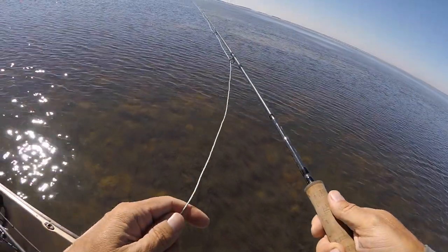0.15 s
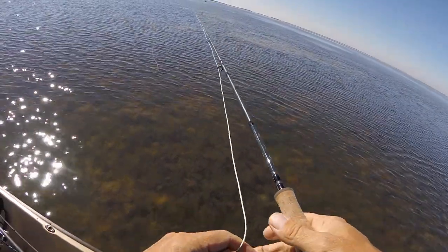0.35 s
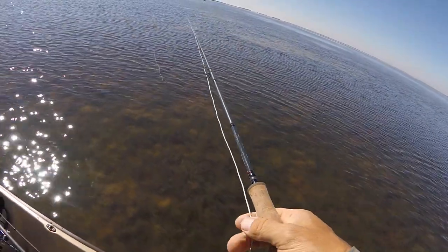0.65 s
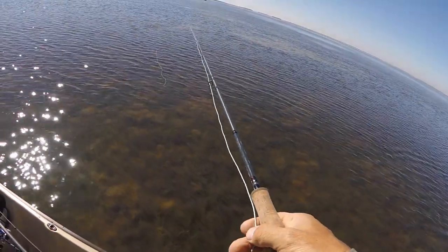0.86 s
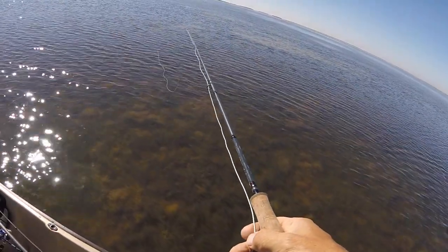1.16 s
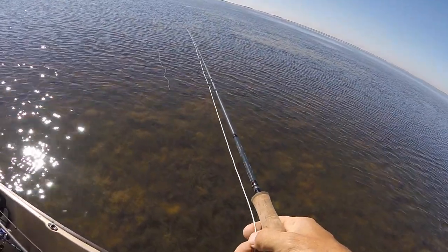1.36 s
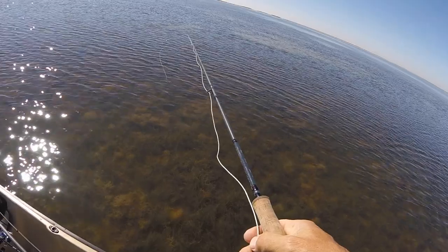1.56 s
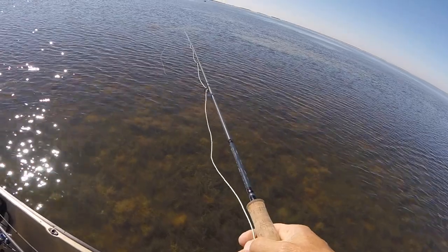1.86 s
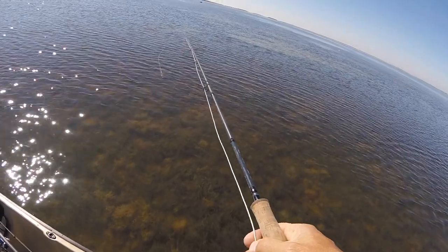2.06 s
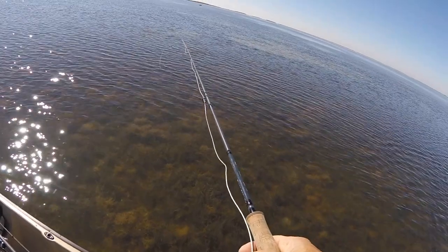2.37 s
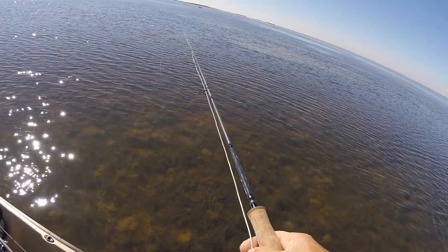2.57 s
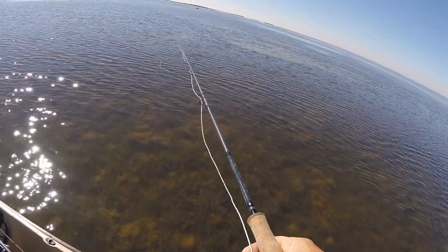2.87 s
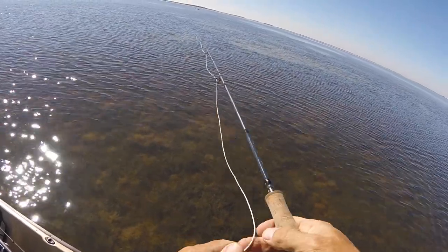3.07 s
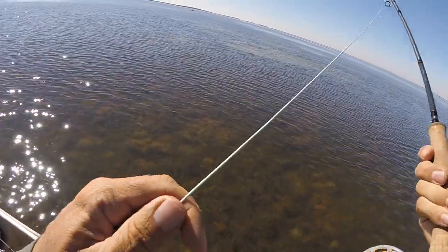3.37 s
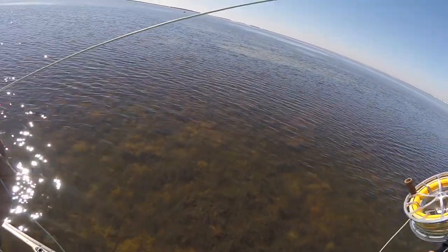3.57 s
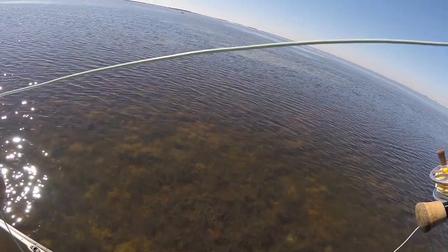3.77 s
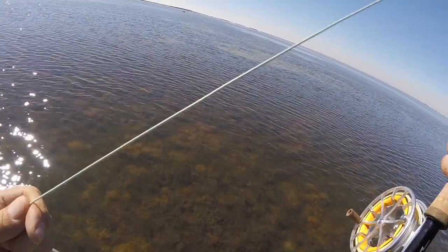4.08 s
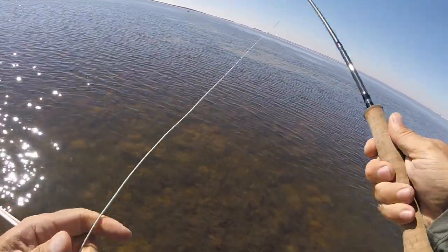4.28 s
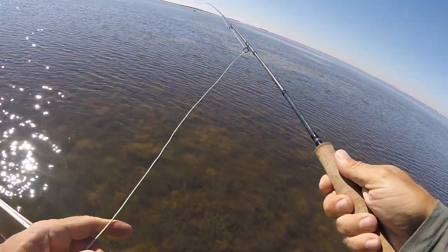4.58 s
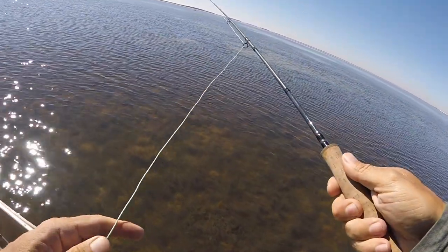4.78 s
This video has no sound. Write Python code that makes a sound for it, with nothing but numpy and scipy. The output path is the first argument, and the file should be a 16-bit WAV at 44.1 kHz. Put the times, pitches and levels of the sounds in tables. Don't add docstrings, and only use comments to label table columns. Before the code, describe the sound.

Close gritty rubs and brief squeaky zips of fishing line through guides, ending in a sharp haul and long fluttering whistle, with soft boat hum.

```python
import sys
import numpy as np
from scipy import signal
from scipy.fft import rfft, irfft, next_fast_len
from scipy.io import wavfile
from scipy.ndimage import uniform_filter1d

SR = 44100
rng = np.random.default_rng(int(sys.argv[2]) if len(sys.argv) > 2 else 0)


def transcribe(u):
    v = np.clip(np.atleast_2d(u).T, -1, 1)
    q = np.round(v * 32767).astype(np.int16)
    wavfile.write(sys.argv[1], SR, q)


def field_ratio(decibels):
    return 10 ** (np.asarray(decibels, dtype=float) / 20)


N = 217608
T = np.arange(N) / SR


def evened(x):
    return x / np.sqrt(np.mean(x ** 2) + 1e-20)


def read(points, hz):
    f, value = np.transpose(points)
    return np.interp(np.log(hz + 1), np.log(f + 1), value)


def shaped(x, gain):
    size = next_fast_len(len(x))
    spectrum = rfft(x, size) * gain(np.fft.rfftfreq(size, 1 / SR))
    return irfft(spectrum, size)[:len(x)]


def band(x, lo_hz, hi_hz):
    return shaped(x, lambda f: 1 / np.sqrt((1 + (lo_hz / (f + 1)) ** 16) * (1 + (f / hi_hz) ** 16)))


def wander(count, hz):
    return evened(shaped(rng.standard_normal(count), lambda f: np.exp(-(f / hz) ** 2)))


def swells(rows, width_s):
    return sum(field_ratio(db) * np.exp(-((T - s) / width_s) ** 2) for s, db in rows)


# time in seconds, level in dB.
GUSTS = [
    (0.04, -52.5),
    (0.32, -61),
    (0.63, -62),
    (0.89, -74),
    (2.62, -77),
    (3.2, -82),
    (3.53, -75),
]


def wind():
    rumble = shaped(band(rng.standard_normal(N), 25.0, 100), lambda f: (f + 20) ** -.5)
    steady = field_ratio(-62 - 3 * T + wander(N, 2.5))
    return evened(rumble) * (steady + swells(GUSTS, width_s=0.14))


# pitch in Hz, level in dB per Hz.
AIR_COLOUR = [(105, -90), (130, 9.5), (162, 8), (360, -13.5), (560, -17), (1000, -24), (1630, -31),
              (2500, -31), (3300, -39.5), (4500, -44.5), (6000, -41.5), (7500, -35), (11000, -42.5),
              (15000, -47.5)]
# time in seconds, level in dB.
HUM_SURGES = [
    (0.45, -45),
    (1.26, -47),
    (2.24, -42.5),
    (3.4, -40.5),
]


def hum_and_hiss():
    air = shaped(rng.standard_normal(N), lambda f: field_ratio(read(AIR_COLOUR, f)))
    hum_level = field_ratio(-47.5 + wander(N, 8.1)) + .5 * swells(HUM_SURGES, width_s=0.032)
    hiss_level = field_ratio(-55 + .5 * wander(N, 5.2))
    return evened(band(air, 143, 286)) * hum_level + evened(band(air, 324, 20000)) * hiss_level


# time in seconds, level in dB.
RIPPLES = [
    (0.45, -64.5),
    (2.05, -64.5),
    (3.15, -71),
    (3.6, -65),
    (3.9, -70),
]


def wash():
    water = evened(band(rng.standard_normal(N), 730, 2080))
    steady = field_ratio(-74 + 3 * T + 1.7 * wander(N, 4.6))
    return water * (steady + swells(RIPPLES, width_s=0.14))


# start in seconds, peak in dB, centre in Hz, width in Hz.
TICKS = [(0.382, -49, 1390, 500), (0.527, -41, 1450, 600), (1.182, -50, 1410, 500), (1.249, -46, 1310, 500),
         (1.653, -44, 1310, 500), (1.956, -43, 1460, 500), (4.194, -42, 1280, 507),
         (0.1161, -48, 6300, 2100), (0.47, -44, 2900, 1800), (3.3, -27, 4200, 1200),
         (3.998, -44, 5300, 600), (0.3294, -56, 4500, 1980), (3.105, -47, 9200, 1500),
         (3.1253, -45, 9250, 1400), (3.1542, -51, 9200, 1300), (3.1794, -60, 10500, 600),
         (4.3889, -38, 10200, 900), (4.4594, -40, 11200, 900), (4.5396, -44, 10600, 900),
         (4.6653, -43, 10800, 900), (4.8359, -42, 10600, 596), (4.8794, -57, 10600, 600)]


def ticks():
    count = 900
    out, t = np.zeros(N), np.arange(count) / SR
    for s, db, hz, width in TICKS:
        puff = shaped(rng.standard_normal(count), lambda f: np.exp(-((f - hz) / width) ** 2))
        puff *= field_ratio(-60 * t / 0.055) * (1 - np.exp(-t / 0.00054))
        at = round(s * SR)
        out[at:at + count] += field_ratio(db - 3.5) * puff / abs(puff).max()
    return out


# pitch in Hz, level in dB per Hz.
HOUSING = [(880, -13), (1500, -12), (1910, -12), (2080, -18.5), (2310, -0.5), (2770, -1.5), (3230, 1),
           (3940, -6), (4190, 3), (4410, 3.5), (4850, -1.5), (5380, 1), (7470, -12), (10700, -16.5),
           (11800, -28), (15300, -46), (22000, -120)]
# pitch in Hz, width in Hz, boost in dB.
RINGS = [(2630, 270, -0.5), (2830, 21, 4), (3010, 18, 8), (3314, 30, 4.5), (3620, 21, 11), (3790, 68, 9.5),
         (4710, 34, 4.5), (5036, 76, 9.5), (5448, 96, 9), (6630, 1180, 14.5), (8750, 210, 5),
         (10900, 3300, 8.5)]
# pitch in Hz, width in Hz, depth in dB.
NOTCHES = [(4400, 380, 13), (7400, 500, 4), (6800, 900, 9), (6450, 350, 4), (2100, 250, 4)]


def housing_db(hz):
    rings = sum(db / (1 + (2 * (hz - f) / w) ** 2) for f, w, db in RINGS)
    notches = sum(db * np.exp(-(2 * (hz - f) / w) ** 2) for f, w, db in NOTCHES)
    return read(HOUSING, hz) + rings - notches


def patchy(x, patch_db, bins, frames):
    z = signal.stft(x, nperseg=256, noverlap=192)[2]
    field = rng.standard_normal(z.shape)
    for _ in range(2):
        field = uniform_filter1d(uniform_filter1d(field, bins, 0), frames, 1)
    return signal.istft(z * field_ratio(patch_db * evened(field)), nperseg=256, noverlap=192)[1][:N]


def pull(start, length, sag_db):
    crest, attack_s, release_s = 0.27, .014, .016
    sag_share = (1.0, 2.1, 2.34)
    u = (T - start) / length
    rise = sag_db[0] * (1 - u / crest) ** 2
    fall = sag_db[1] * ((u - crest) / (1 - crest)) ** 2
    sag = np.minimum(np.where(u < crest, rise, fall), 40)
    edges = np.clip(np.minimum((T - start) / attack_s, (start + length - T) / release_s) + .5, 0, 1)
    return edges * field_ratio(-np.outer(sag_share, sag))


# start in seconds, length in seconds, rub in dB, extra for the low part in dB, for the high in dB.
SHORT_RUBS = [(0.26, 0.067, -73, 10.5, 0), (0.35, 0.21, -72.5, 12.5, -6), (0.58, 0.18, -81.5, 23.5, -2),
              (0.89, 0.23, -78.5, 11, -18), (1.2, 0.2, -69, 5, -14), (1.29, 0.1, -63, 11, 0),
              (1.33, 0.26, -52, 3, -4.5), (1.81, 0.24, -68.5, -4, -2), (1.895, 0.074, -58, 10, -1),
              (1.915, 0.29, -48.5, 0, -2), (2.255, 0.013, -63.5, 2, 2), (2.35, 0.14, -67, -1, -2),
              (2.538, 0.33, -48, -3.5, -7), (2.62, 0.24, -51, 0, 1.5), (2.89, 0.024, -66, -15, -2),
              (3.02, 0.14, -62, -8, -6), (3.08, 0.088, -50.5, -10, -16), (3.66, 0.38, -63, -6, -20),
              (3.9, 0.13, -62, -16, -14), (3.965, 0.027, -54, -16, -14), (1.985, 0.026, -72, 0, 25),
              (2.035, 0.036, -73, 0, 22), (4.27, .07, -70, 0, 14), (4.385, 0.061, -74, 0, 22),
              (4.45, 0.032, -79, 0, 18), (4.535, 0.027, -75, 0, 22), (4.66, 0.02, -74, 0, 26),
              (2.655, .02, -70, 0, 20), (2.72, 0.056, -69.5, 0, 18.5), (1.34, 0.026, -74.5, 0, 19.5)]
PULLS = [(0.2, 0.92, -93.5, 25.5, -5), (0.0, 0.22, -78, 10.5, -6), (3.125, 0.062, -58, -11, -8),
         (3.17, 0.068, -45, -8, -18), (3.22, 0.082, -39.5, -8, -20), (3.28, 0.15, -38, -13, -18.5),
         (3.4, 0.18, -44, -13, -5), (3.55, 0.064, -48, -10, -12), (3.97, 0.44, -55, -2, -1.5),
         (4.19, 0.13, -45.5, -1, -8), (4.26, 0.21, -43, -10, -14.5), (4.41, 0.23, -40, -13.5, -12),
         (4.61, 0.31, -42, -13.5, -13.5)]


def rubbing():
    rest_db = np.array((-76.5, -99, -80))[:, None]
    creep_db_per_s = [0, 0, 4]
    power = field_ratio(rest_db + np.outer(creep_db_per_s, T)) ** 2
    for rows, sag_db in (SHORT_RUBS, (8, 8.5)), (PULLS, (4.5, 2.5)):
        for start, length, db, low_db, high_db in rows:
            part_level = field_ratio(db + np.array([[low_db], [0], [high_db]]))
            power = power + (part_level * pull(start, length, sag_db)) ** 2
    grit = rng.standard_normal(N)
    grit *= field_ratio(1.2 * wander(N, 170) + .9 * wander(N, 50) + .3 * wander(N, 14))
    grit = patchy(grit, 2.5, bins=2, frames=8)
    grit = patchy(grit, .4, bins=6, frames=30)
    grit = shaped(grit, lambda f: field_ratio(housing_db(f)))
    parts_hz = [(1500, 3690), (4350, 5330), (7200, 18500)]
    return sum(np.sqrt(p) * evened(band(grit, lo, hi)) for p, (lo, hi) in zip(power, parts_hz))


# pitch in Hz, level in dB.
ZIP_COLOUR = [(1000, -26), (1550, -23), (2000, -16), (3400, -4), (4450, -7), (5400, 0), (6150, -13),
              (6900, -8), (7500, -16), (8200, -11), (9000, -17), (10600, -13), (14000, -28)]


def zip_tone(speed, bite_db, partials_db, colour=.35, jitter=.009, blur=.06, clear=.66, skirt=.45,
             flutter_db=2.2):
    s, hz = np.transpose(speed)
    on = (T >= s[0] - .004) & (T < s[-1] + .004)
    t = T[on]
    rate = np.interp(t, s, hz) * (1 + jitter * wander(len(t), 79))
    turns, out = np.cumsum(rate) / SR, np.zeros(N)
    for k, db in enumerate(partials_db, 1):
        ring_db = housing_db(k * rate) - read(HOUSING, k * rate)
        passing_db = read(ZIP_COLOUR, k * rate) + colour * ring_db
        dulling_db = (k > 2) * 2.0 * rate / 1000
        flutter = flutter_db * wander(len(t), 110)
        level = field_ratio(np.interp(t, s, bite_db) + db - dulling_db + passing_db + flutter)
        spread_hz = blur * hz.mean() * np.sqrt(k)
        fuzz = clear + skirt * (wander(len(t), spread_hz) + 1j * wander(len(t), spread_hz))
        whistle = (fuzz * np.exp(2j * np.pi * k * turns)).real
        out[on] += np.sqrt(2) * level * whistle * (k * rate < 15000)
    out[on] *= signal.windows.tukey(len(t), min(0.0043 * SR / len(t), 1))
    return out


def glide(start, length, from_hz, to_hz, db):
    u = np.linspace(0, 1, 9)
    speed = np.transpose([start + length * u, to_hz + (from_hz - to_hz) * (1 - u) ** 1.5])
    return speed, db - 20 * (u - .6) ** 2


# start in seconds, length in seconds, from Hz, to Hz, bite in dB.
GLIDES = [
    (1.335, .08, 2590, 4400, -45),
    (2.57, .035, 2480, 3080, -46),
    (2.012, .045, 4250, 5250, -39),
]
SQUEALS = [(1.9, .018, 2600, 4200, -41), (1.914, .03, 6150, 6250, -37), (2.06, .03, 5000, 5100, -45),
           (3.02, .05, 4620, 4560, -49), (2.69, .075, 3400, 2900, -43), (2.56, .03, 5050, 5050, -48),
           (3.085, .035, 5000, 5050, -47), (3.49, .048, 3840, 4250, -42), (2.628, .016, 5000, 5150, -43),
           (2.668, .024, 5100, 5150, -41), (1.364, .016, 5050, 5300, -50), (1.4, .022, 5100, 5050, -48),
           (1.476, .018, 5450, 5000, -48), (1.897, .018, 5400, 5500, -50), (3.985, .012, 8200, 8400, -45),
           (2.7, .012, 5050, 5050, -43), (2.72, .045, 10900, 11000, -44), (2.757, .018, 5400, 4900, -45),
           (2.785, .015, 5050, 5000, -47), (3.292, .03, 5500, 5550, -43), (3.325, .025, 4500, 4800, -36),
           (3.44, .025, 9000, 9500, -40), (3.755, .03, 1600, 1600, -40), (3.745, .04, 2400, 2420, -55),
           (3.825, .025, 1900, 1750, -46), (3.835, .03, 2450, 2450, -56)]
GLIDE_PARTIALS_DB = (0, -1, -4)


def glides_and_squeals():
    glides = sum(zip_tone(*glide(*row), GLIDE_PARTIALS_DB) for row in GLIDES)
    return glides + sum(zip_tone(*glide(*row), [0]) for row in SQUEALS)


# time in seconds, ridges a second in Hz.
# The bite lists say how hard the ridges bite at each of those moments, in dB.
SECOND, SECOND_BITE_DB = [(1.946, 2250), (1.958, 2600), (1.968, 3050), (1.98, 3330), (1.993, 3530),
                          (2.006, 3580)], [-41, -42, -46, -37, -35, -40]
THIRD, THIRD_BITE_DB = [(2.632, 2850), (2.65, 3120), (2.665, 3400), (2.68, 4100), (2.7, 4400),
                        (2.722, 4650), (2.74, 4050)], [-50, -43, -45, -46, -48, -46, -49]
THIRD_PARTIALS_DB = (-1, 3, -6)


def strip_zips():
    third = zip_tone(THIRD, THIRD_BITE_DB, THIRD_PARTIALS_DB)
    return third + zip_tone(SECOND, SECOND_BITE_DB, GLIDE_PARTIALS_DB, clear=.75, skirt=.36)


# time in seconds, ridges a second in Hz.
# The bite list gives dB at each of those moments, the partials dB from the lowest up.
DRIFT, DRIFT_BITE_DB = [(4.015, 2700), (4.03, 2710), (4.041, 2500), (4.052, 2750), (4.066, 2880),
                        (4.08, 2480), (4.092, 2570), (4.113, 2680)], [-42, -43, -44, -42, -44, -47, -45, -47]
DRIFT_PARTIALS_DB = (0, 0, 2, -18)


def drift_zip():
    return zip_tone(DRIFT, DRIFT_BITE_DB, DRIFT_PARTIALS_DB)


# time in seconds, ridges a second in Hz.
# The bite lists give dB at each of those moments, the partials dB from the lowest up.
BRAKE, BRAKE_BITE_DB = [(3.54, 5380), (3.552, 4750), (3.565, 4150), (3.573, 3650), (3.581, 2700),
                        (3.595, 1900), (3.607, 1400)], [-41, -38, -34, -37, -41, -39, -50]
LIFT, LIFT_BITE_DB = [(3.915, 930), (3.945, 1240), (3.968, 1480), (3.985, 1850), (4.0, 2330), (4.015, 2700)], [-41, -42, -49, -48, -43, -41]
SETTLE, SETTLE_BITE_DB = [(4.113, 2680), (4.121, 2250), (4.157, 2270), (4.162, 1990), (4.186, 1960)], [-48, -42, -43, -42, -44]
LIGHT_PARTIALS_DB = (0, 0, -13, -20)


def slack_zips():
    stages = [(BRAKE, BRAKE_BITE_DB), (LIFT, LIFT_BITE_DB), (SETTLE, SETTLE_BITE_DB)]
    return sum(zip_tone(speed, bite_db, LIGHT_PARTIALS_DB) for speed, bite_db in stages)


# time in seconds, ridges a second in Hz.
# The bite lists give dB at each of those moments, the partials dB from the lowest up.
LOAD, LOAD_BITE_DB = [(3.27, 1300), (3.32, 1490), (3.34, 1600), (3.36, 1660), (3.38, 1980), (3.395, 2350),
                      (3.408, 2720), (3.422, 2660), (3.44, 2850)], [-46, -39, -36, -37, -37, -35, -34, -39, -36]
HAUL, HAUL_BITE_DB = [(3.44, 2850), (3.452, 3020), (3.465, 3420), (3.478, 4050), (3.49, 4230), (3.5, 4950),
                      (3.513, 5080), (3.526, 5480), (3.54, 5380)], [-35, -32, -27, -31, -32, -33, -37, -33, -42]
LOAD_PARTIALS_DB, HAUL_PARTIALS_DB = (-1, -1, -4, -16), (0, -4, -14, -20)


def haul_zips():
    load = zip_tone(LOAD, LOAD_BITE_DB, LOAD_PARTIALS_DB)
    return load + zip_tone(HAUL, HAUL_BITE_DB, HAUL_PARTIALS_DB)


# time in seconds, ridges a second in Hz.
# The bite lists give dB at each of those moments, the partials dB from the lowest up.
SHOOT, SHOOT_BITE_DB = [(4.178, 1900), (4.2, 2940), (4.22, 3500), (4.245, 4300), (4.264, 4077),
                        (4.278, 3716), (4.29, 3638), (4.33, 3731), (4.35, 3680)], [-44, -41, -50, -50, -48, -40, -35, -38, -40]
CARRY, CARRY_BITE_DB = [(4.35, 3680), (4.38, 3305), (4.398, 3270), (4.426, 3700), (4.46, 3850),
                        (4.49, 4080), (4.514, 4100), (4.548, 3952), (4.575, 3880)], [-40, -41, -40, -43, -43, -44, -44, -38, -38]
RUNOUT, RUNOUT_BITE_DB = [(4.575, 3880), (4.614, 3950), (4.648, 3720), (4.688, 3517), (4.708, 3997),
                          (4.73, 4062), (4.758, 3860), (4.788, 4040)], [-38, -40, -39, -45, -41, -41, -47, -40]
SLOWING, SLOWING_BITE_DB = [(4.788, 4040), (4.81, 4050), (4.826, 3864), (4.848, 3500), (4.9, 3610)], [-40, -39, -46, -44, -56]
SHOOT_PARTIALS_DB = (0, -2, -12, -18)


def shoot_zips():
    stages = [(SHOOT, SHOOT_BITE_DB), (CARRY, CARRY_BITE_DB),
              (RUNOUT, RUNOUT_BITE_DB), (SLOWING, SLOWING_BITE_DB)]
    loose = dict(clear=.56, skirt=.52, blur=.065, flutter_db=2.6, jitter=.013)
    return sum(zip_tone(speed, bite_db, SHOOT_PARTIALS_DB, **loose) for speed, bite_db in stages)


# time in seconds, extra bite in dB.
CATCHES = [(1.984, 2), (1.994, 4), (2.03, 3), (2.044, 2), (2.655, 6), (3.336, 4), (3.405, 10), (3.437, 13),
           (3.462, 2), (3.503, 3), (3.525, 8.5), (4.0, 6), (4.015, 4), (4.048, 5)]


def catching(zips):
    catch_db = sum(db * np.exp(-((T - s) / .005) ** 2) for s, db in CATCHES)
    return zips + band(zips, 3000, 7600) * (field_ratio(catch_db) - 1)


def mirrored(x, edge_hz=11650, image_db=-9.0, clock_hz=24000):
    kept = shaped(x, lambda f: 1 / np.sqrt(1 + (f / edge_hz) ** 40))
    flipped = np.conj(signal.hilbert(kept, next_fast_len(N))[:N])
    image = (flipped * np.exp(2j * np.pi * clock_hz * T)).real

    def image_gain(f):
        return field_ratio(image_db - 7 * abs(f - 13400) / 1000) * (abs(f - 14000) < 2000)
    return kept + shaped(image, image_gain)


def scene():
    zips = haul_zips() + drift_zip() + strip_zips() + slack_zips() + shoot_zips() + glides_and_squeals()
    background = hum_and_hiss() + wash() + wind()
    line = rubbing() + ticks() + catching(zips)
    return (background + mirrored(line))[None]


def top_cut(x):
    return signal.sosfilt(signal.butter(12, 15190, fs=SR, output="sos"), x)


def record(dry):
    mix = shaped(dry[0], lambda f: f < 15250)[None]
    return top_cut(mix)


dry = scene()
out = record(dry)
transcribe(out)
```